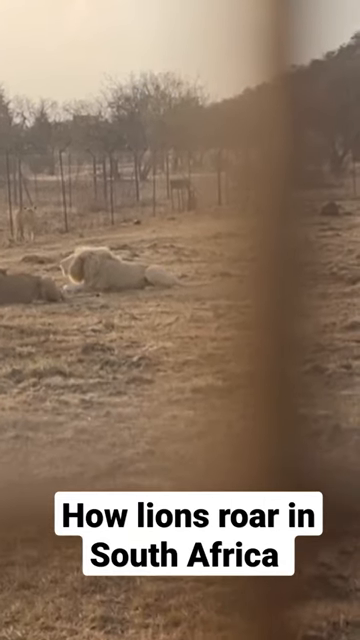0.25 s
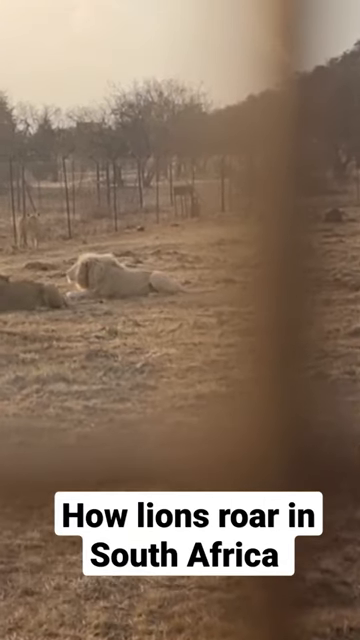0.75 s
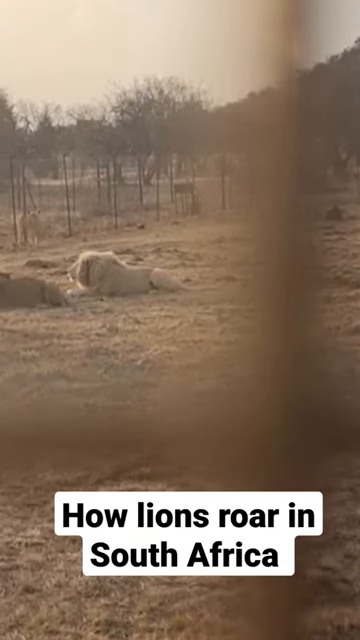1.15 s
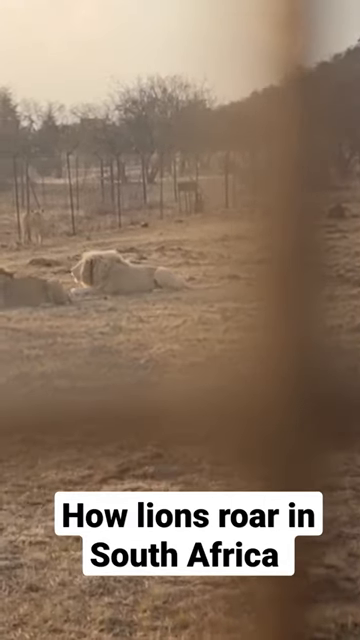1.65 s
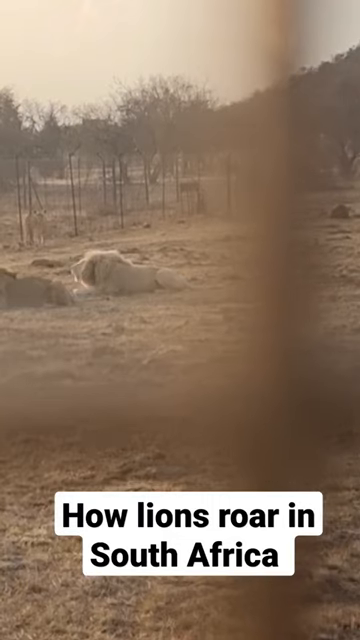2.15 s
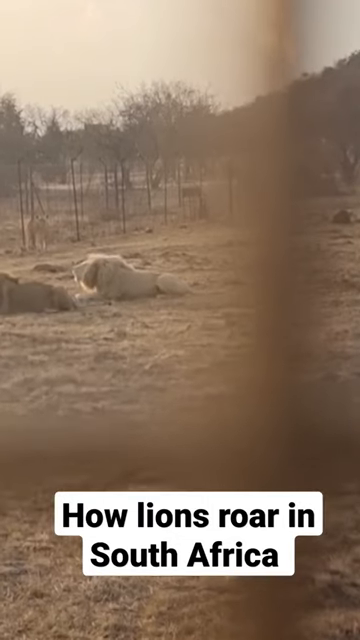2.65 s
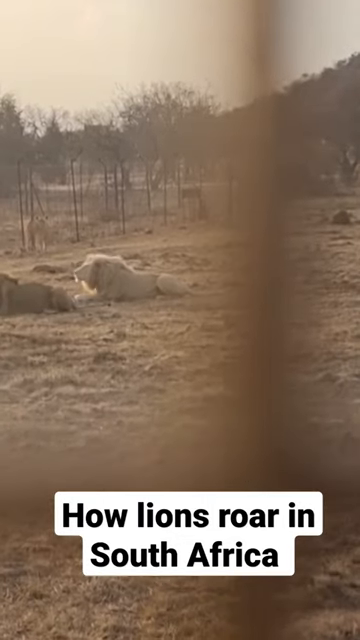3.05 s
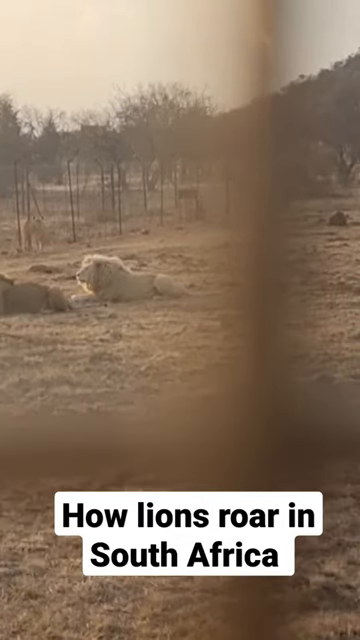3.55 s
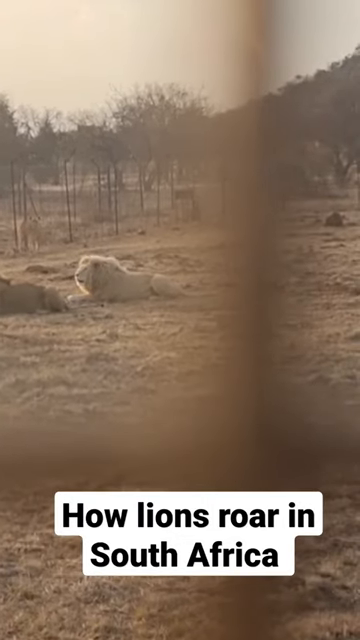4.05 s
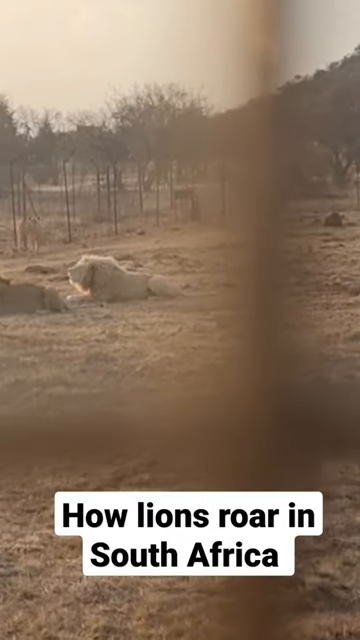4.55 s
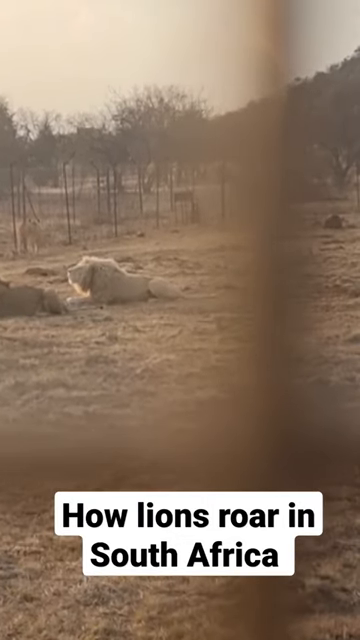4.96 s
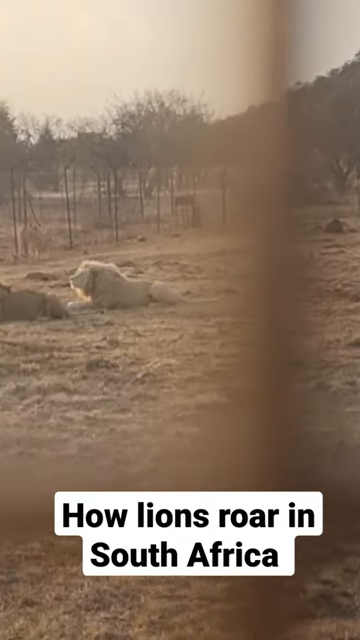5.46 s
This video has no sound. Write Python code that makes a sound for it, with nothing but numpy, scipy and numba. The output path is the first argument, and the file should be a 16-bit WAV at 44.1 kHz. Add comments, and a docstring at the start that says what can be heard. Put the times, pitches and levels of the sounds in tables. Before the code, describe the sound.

A lion gives three loud, deep roars outdoors, each breaking into a growl and followed by a short rough grunt, over quiet open air.

```python
"""A lion roars three times across an open enclosure, over quiet outdoor air: filtered noise.
The first roar opens in voice; the next two start as growls. Each is a falling tone that breaks up,
made by beating vocal folds that ring the throat and mouth, with a rumbling chest and hissing air.
Soft hums fill the pauses, a short rough grunt of slack folds follows each roar, and noise scuffs nearby.
A fence and a hill add short and long faint tails; the last grunt runs into the end."""
import sys
import numpy as np
from scipy import signal
from scipy.fft import rfft, irfft
from scipy.io import wavfile
from scipy.ndimage import uniform_filter1d
from numba import njit

SR = 44100
rng = np.random.default_rng(int(sys.argv[2]) if len(sys.argv) > 2 else 0)


def output_pcm(signal):
    """Save a mono or channel-first signal as 16-bit PCM at the path in sys.argv[1].

    Samples are clipped to [-1, 1] before scaling.
    """
    pcm = np.clip(np.atleast_2d(signal).T, -1, 1) * 32767
    wavfile.write(sys.argv[1], SR, np.round(pcm).astype(np.int16))


N = 252252
TIME = np.arange(N) / SR  # seconds


def undb(db):
    """Decibels to gain."""
    return 10 ** (np.asarray(db) / 20)


def unit(x):
    """Scale to an average level (rms) of 1."""
    return x / np.sqrt(np.mean(x ** 2))


def steady(x, seconds):
    """Even out swells slower than the given time, to a level near 1."""
    size = int(seconds * SR)
    power = uniform_filter1d(uniform_filter1d(x ** 2, size), size)
    return x / np.sqrt(power + 1e-9)


def swell(tables, axis):
    """Gain over time from one dB column of several calls; 15 ms fades lead to silence between them."""
    gain = 0
    for rows in map(np.array, tables):
        depth_inside = np.minimum(TIME - rows[0, 0], rows[-1, 0] - TIME)
        inside = np.clip(1 + depth_inside / .015, 0, 1)
        gain = gain + inside * undb(np.interp(TIME, rows[:, 0], rows[:, axis]))
    return gain


def glide(tables):
    """Second column of the tables, gliding over time from row to row."""
    rows = np.vstack(tables)
    return np.interp(TIME, rows[:, 0], rows[:, 1])


def walk(rate):
    """Smooth chance that heads for a new value `rate` times a second; rms 1."""
    size = int(SR / rate)
    steps = np.repeat(rng.standard_normal(N // size + 1), size)
    return unit(uniform_filter1d(steps, size)[:N])


def bursts(events):
    """Gain over time of quick swells that die away."""
    gain = 0
    for start, db, decay in events:
        age = np.maximum(TIME - start, 0)
        gain = gain + undb(db) * (1 - np.exp(-age / 0.0048)) * np.exp(-age / decay)
    return gain


def hold(start, length, attack, release):
    """Gain over time: rise to the start, hold for the length, die away."""
    before = np.maximum(start - TIME, 0)
    after = np.maximum(TIME - start - length, 0)
    return np.exp(-before / attack - after / release)


def level_off(gain, knee_db):
    """Grows in step with the gain, then flattens towards 1 above the knee."""
    return gain / (gain + undb(knee_db))


def colour(x, points, size=16384):
    """Filter through (Hz, dB) points, with no sound ahead of its cause (minimum phase)."""
    hz, db = np.transpose(points)
    bins = np.arange(size // 2 + 1) * SR / size
    cepstrum = irfft(np.log(undb(np.interp(np.log(bins + 1), np.log(hz), db))))
    # folding the second half onto the first makes the filter causal
    cepstrum[1:size // 2] *= 2
    cepstrum[size // 2 + 1:] = 0
    return signal.fftconvolve(x, irfft(np.exp(rfft(cepstrum))))[:N]


@njit
def band(x, g, k):
    """Band-pass with moving tuning g and relative width k, passed twice so that the valleys stay dark."""
    y, b, low = x.copy(), np.zeros(2), np.zeros(2)
    for i in range(len(x)):
        scale = 1 / (1 + g[i] * (g[i] + k))
        for j in range(2):
            v = (b[j] + g[i] * (y[i] - low[j])) * scale
            b[j], low[j], y[i] = 2 * v - b[j], low[j] + 2 * g[i] * v, k * v
    return y


def resonate(x, modes, stretch, jaw=1):
    """Parallel resonances: stretch shifts them all, the jaw mostly those near 1.2 kHz."""
    out = 0
    for hz, width, db in modes:
        reach = np.exp(-(np.log2(hz / 1200) / .6) ** 2)
        tuning = np.tan(np.pi * hz / SR) * stretch * (1 + reach * (jaw - 1))
        out = out + undb(db) * band(x, tuning * np.ones(N), width / hz)
    return out


def scatter(x, t60, tone):
    """Diffuse reflections that die away by 60 dB in t60 seconds."""
    age = TIME[:int(t60 * SR)]
    tail = rng.standard_normal(len(age)) * undb(-60 * age / t60) * (1 - np.exp(-age / 0.0011))
    tail = tail / np.sqrt(np.sum(tail ** 2))
    return colour(signal.fftconvolve(x, tail)[:N], tone)


def smear(x, t60, share):
    """Many close reflections blur each slap and comb the spectrum finely."""
    return np.sqrt(1 - share) * x + np.sqrt(share) * scatter(x, t60, [(100, 0), (1000, 0)])


def swing(hz, jitter):
    """Phase of the heavy folds, with a slightly unsteady pitch."""
    return 2 * np.pi * np.cumsum(hz * (1 + jitter * walk(60))) / SR


def hum(hz, jitter):
    """The nearly pure fundamental of heavy folds; rms 1."""
    return np.sqrt(2) * np.sin(swing(hz, jitter))


def folds(hz, jitter, scatter_db, open_share):
    """Vocal folds: one slap a cycle, uneven in time and size, and a puff of turbulence after each."""
    turns = np.cumsum(hz * np.exp(jitter * walk(150))) / SR
    cycle = turns.astype(int)
    chance = np.clip(rng.standard_normal(N // 50), -1.5, 1.5)
    size = undb(scatter_db * chance)[cycle]
    slaps = np.diff(cycle, prepend=0) * size
    # each puff fades over the open share of a cycle
    puffs = size * np.exp(-(turns % 1) / open_share) * rng.standard_normal(N)
    return unit(slaps), unit(puffs)


# The quiet outdoor air's tone. Each row: pitch in Hz, level in dB.
AIR_TONE = [(22, -26.5), (43, -8.5), (65, 2.5), (100, -14.5), (150, -0.5), (240, -25), (400, -23.5),
            (600, -25.5), (1100, -30), (1700, -38), (3000, -41), (5000, -48.5), (9000, -49.5), (15000, -57)]


def field():
    """Quiet outdoor air: a shared low rumble and a faint hiss that differs at each ear."""
    mid = unit(colour(rng.standard_normal(N), AIR_TONE))
    side = unit(colour(rng.standard_normal(N), AIR_TONE))
    side = colour(side, [(100, -20.5), (500, -8), (3000, 1.5)])
    breeze = undb(1.3 * walk(6))
    return undb(-50.5) * breeze * (mid + side * np.array([[1], [-1]]))


# Side branches of the tract swallow narrow bands. Each row: pitch in Hz, level in dB.
VALLEYS = [(440, 3), (520, -7), (590, 3), (1850, 1), (2010, -3), (2150, 1), (2440, -2.5), (2530, -18.5),
           (2630, -0.5)]
# The open mouth favours the upper middle. Each row: pitch in Hz, level in dB.
LIPS = [(650, 0), (810, -3), (1050, 0.5), (1350, -0.5), (1600, 2), (1950, 0), (3500, 1.5)]


def tract(throat_gain, mouth_gain, drive, throat, mouth, stretch, jaw=1):
    """The folds ring the resonances of the throat and the mouth, each with its own level."""
    drive = colour(drive, VALLEYS)
    blurred = smear(colour(drive, LIPS, size=2048), t60=.11, share=.38)
    throat_ring = steady(resonate(drive, throat, stretch), 0.048)
    mouth_ring = steady(resonate(blurred, mouth, stretch, jaw), 0.078)
    return throat_gain * throat_ring + mouth_gain * mouth_ring


# Rough, wavering second and third partials.
# Each entry: level in dB relative to the throat, before wavering.
OVERTONES = [2, -10]


def partials(phase):
    """The lowest overtones of the folds, each wavering quickly in level and phase."""
    return sum(undb(db) * undb(3 * walk(45)) * np.sin(k * phase + .6 * walk(70))
               for k, db in enumerate(OVERTONES, 2))


# Throat and mouth resonances in the full roar. Each row: pitch in Hz, width in Hz, relative level in dB.
ROAR_THROAT = [(361, 61, -1), (413, 92, 4.5)]
ROAR_MOUTH = [(660, 80, -0.5), (709.2, 32, -2), (974, 74, 2), (1145, 53, 1.5), (1334, 57, 3.5),
              (1398, 22, 7), (1622, 61, -11), (1780, 85, -5.5), (2208, 86, -7.5), (2399, 110, -6.5),
              (2716, 110, -22), (3370, 74, -18.5), (3870, 180, -21)]


def full_roar(throat, mouth, voiced, locked):
    """Evenly beating folds ring the wide-open tract, which nearly holds its shape."""
    held = 1 + .008 * walk(14)
    return np.sqrt(locked) * tract(throat * undb(-1), mouth, voiced, ROAR_THROAT, ROAR_MOUTH, held)


# How the air passing the teeth sounds. Each row: pitch in Hz, level in dB.
HISS_TONE = [(1700, -52), (2400, -9.5), (2750, 5.5), (3050, -1.5), (3400, -0.5), (4100, -7), (5000, -14.5),
             (7000, -21), (10500, -26), (11500, -31), (15000, -37.5)]


def teeth_hiss(puffs, gusts, effort, locked):
    """Air hisses past the teeth; it grows with effort, levels off, and is softer when the folds lock."""
    full_db, knee_db, locked_db = -40, -32.5, -8.5
    air = smear(puffs + .6 * gusts, t60=.08, share=.75)
    level = level_off(effort, knee_db) * undb(full_db + locked_db * locked)
    return level * steady(colour(air, HISS_TONE), 0.043)


def treble_spray(effort):
    """A fine spray of treble noise rises and falls with the effort."""
    noise = colour(rng.standard_normal(N), [(2000, -15.5), (6500, 9.0), (15000, -7.0)])
    return undb(-33) * effort * unit(noise)


# The shaken chest's tone. Each row: pitch in Hz, level in dB.
CHEST_TONE = [(22, -41.5), (45, -16.5), (70, -4.5), (95, 3.5), (120, 9), (150, 1), (210, 2.5), (260, -5.5),
              (400, -69), (1500, -110)]
# Spells of low chest rumble within the roars; the first is brief and faint, right at the start. Each row: start
# in seconds, length in seconds, chest level in dB before the roar's overall mix.
RUMBLES = [(0, 0.088, -37.5), (0.562, 0.12, -22.5), (2.358, 0.21, -24), (3.066, 0.25, -31.5),
           (4.618, 0.28, -35), (4.777, 0.21, -23.5), (5.496, 0.047, -28)]


def chest_rumble(slack, gusts, effort):
    """The slow flapping shakes the chest, in spells of rumble and, more softly, under the whole effort."""
    attack_s, release_s, undertone_db = 0.047, 0.043, -7.5
    rumble = colour(slack, CHEST_TONE) + resonate(gusts, [(127.8, 32, 4.1)], stretch=0.88)
    shake = sum(undb(db) * hold(start, length, attack_s, release_s) for start, length, db in RUMBLES)
    return np.hypot(shake, effort * undb(undertone_db)) * steady(rumble, .016)


# Throat and mouth resonances in a growl. Each row: pitch in Hz, width in Hz, relative level in dB.
GROWL_THROAT = [(344.4, 76.7, 0.5), (405, 31, -10)]
GROWL_MOUTH = [(585, 180, -10), (756, 76, -1.5), (1060.5, 80, 6.5), (1164, 79, 2), (1345, 95, 2),
               (1734, 110, -6.5), (1868, 46, -14), (2262, 150, -9), (2650, 300, -13)]
# The jaws open and close in growls and grunts. Each row: time in seconds,
# tuning factor for mouth resonances near 1.2 kHz (a weaker shift further away).
JAW = [(.4, 1.17), (.5, 1.14), (.62, 1.03), (1.42, 0.96), (1.49, 0.87), (1.56, 1.27), (1.62, 0.97),
       (2.28, 1), (2.38, 1.14), (2.83, 1.08), (2.92, 1.07), (3.1, 0.89), (3.25, 1.056), (4, 1.015),
       (4.65, 1), (4.72, 1.113), (5.21, 1.146), (5.32, 1.004), (5.5, 0.98)]


def slack_growl(throat, mouth, slack, locked, loose):
    """Slack, flapping folds ring a loose tract that shifts about as the jaws move."""
    growl = tract(throat * undb(-0.5), mouth, slack, GROWL_THROAT, GROWL_MOUTH, loose, glide([JAW]))
    return np.sqrt(1 - locked) * growl


# The throat catches and the rasp flares.
# Each row: start in seconds, level in dB before the swell and decay, decay in seconds.
CATCHES = [(.46, -44.5, 0.04), (2.81, -31.5, 0.032), (2.912, -29.5, .02), (4.589, -42, 0.012),
           (4.657, -24.5, 0.02), (5.183, -29, 0.041), (5.31, -29, 0.041)]


def throat_catches(slack, loose):
    """Brief flares of blurred slack folds, ringing the mouth."""
    blurred = smear(slack, t60=.1, share=.5)
    rasp = resonate(blurred, GROWL_MOUTH, loose, glide([JAW]))
    return bursts(CATCHES) * steady(rasp, 0.053)


# The voice of each roar, one list a roar.
# Each row: time in seconds, pitch in Hz, level of the fundamental in dB before shudder and mix.
VOICE = [
    [(0, 211.1, -7), (.13, 206.4, -11), (.21, 196.4, -8.5), (.25, 238.9, -28.5), (.34, 235.2, -27.5),
     (.36, 161.4, -23), (.4, 156.3, -7), (.5, 145.4, -11), (.62, 138.2, -9.5), (.7, 104.7, -22),
     (.77, 110, -26), (.81, 111, -46)],
    [(2.25, 145, -28), (2.32, 159.3, -18), (2.41, 116.9, -13.5), (2.44, 124.9, -14), (2.46, 207.2, -8.5),
     (2.58, 205.6, -9.5), (2.75, 188.7, -20.5), (2.81, 156.1, -22.5), (3, 141.2, -14.5), (3.15, 116, -30.5),
     (3.23, 125.8, -20), (3.36, 92, -30.5)],
    [(4.57, 150.7, -35.5), (4.65, 147, -14), (4.71, 165.3, -29), (4.77, 201.5, -14), (4.9, 205.3, -9.5),
     (5.04, 192.2, -11.5), (5.08, 183.2, -18.5), (5.115, 159, -14.5), (5.24, 152.2, -7.5),
     (5.45, 133.2, -10.5), (5.54, 114.9, -21.5), (5.58, 93.7, -27)],
]
# How evenly the folds swing in the roars. Each row: time in seconds, locked share from 0 to 1.
LOCK = [(0, .72), (.3, .82), (.36, .5), (.53, .3), (.62, .05), (2.38, .08), (2.5, .85), (2.7, .72), (3, .3),
        (3.1, .05), (4.7, .04), (4.82, .65), (5.02, .75), (5.2, .68), (5.35, .25), (5.5, .05)]
# Effort in each roar, one list a roar. Each row: time in seconds, effort in dB (it drives the rasp).
EFFORT = [
    [(0.0, -22.5), (0.03, -36.5), (0.342, -27), (0.452, -35.5), (0.482, -31), (0.524, -37), (0.664, -34.5),
     (0.84, -67)],
    [(2.22, -66), (2.276, -44.5), (2.372, -33), (2.838, -31), (3.052, -40.5), (3.078, -35.5), (3.316, -50),
     (3.42, -65.5)],
    [(4.54, -75), (4.602, -33), (4.826, -24), (5.17, -29.5), (5.188, -26), (5.454, -38), (5.492, -32.5),
     (5.61, -65.5)],
]
# The folds close cleanly only in the upper register.
# Each row: pitch in Hz, clean share of the drive from 0 to 1.
REGISTER = [(170, .15), (204, .72)]


def roars():
    """Heavy folds swing evenly when locked and flap slowly, irregularly when slack; effort drives the rasp."""
    hz, locked, effort = glide(VOICE), glide([LOCK]), swell(EFFORT, axis=1)
    slackness = (1 - locked) ** 4

    # the fundamental shudders more as the folds go slack
    shudder = undb(np.interp(slackness, [0, 1], [1.4, 3.2]) * walk(65))
    phase = swing(hz, jitter=.011 + .035 * slackness)
    tone = swell(VOICE, axis=2) * shudder * np.sqrt(2) * np.sin(phase)

    slaps, puffs = folds(hz, jitter=.016 * (1.3 - locked) / .6, scatter_db=3, open_share=.45)
    flaps, gusts = folds(np.full(N, 70.), jitter=.22, scatter_db=3.5, open_share=.33)
    clean = np.interp(hz, *np.transpose(REGISTER))
    voiced = np.sqrt(clean) * slaps + np.sqrt(1 - clean) * puffs
    slack = flaps + .6 * gusts

    # the throat grows with effort up to a knee, then levels off
    throat_db, throat_knee_db, rasp_db = -23.5, -32.5, -1
    # above this pitch the overtone leaves the throat resonance
    throat_top_hz, loss_db_per_hz = 223.4, .5
    loss_db = loss_db_per_hz * np.maximum(hz - throat_top_hz, 0)
    throat = level_off(effort, throat_knee_db) * undb(throat_db - loss_db)
    mouth = effort * undb(rasp_db)
    loose = 1 + .02 * walk(22)

    voice = undb(0.5) * tone + locked * clean * throat * partials(phase)
    voice = voice + undb(1.4) * full_roar(throat, mouth, voiced, locked)
    voice = voice + undb(-1.7) * slack_growl(throat, mouth, slack, locked, loose)
    voice = voice + throat_catches(slack, loose) + undb(5.5) * chest_rumble(slack, gusts, effort)
    return voice + teeth_hiss(puffs, gusts, effort, locked) + treble_spray(effort)


def fence(direct):
    """The fence scatters mostly treble sideways: a very short tail, opposite in the two ears."""
    tone = [(150, -23.0), (350, -16.0), (700, -8.5), (1400, -11.5), (2200, -5.5), (5000, -6.5)]
    return scatter(direct, t60=0.062, tone=tone) * np.array([[1], [-1]])


def hill(direct):
    """Trees and hill send back a faint, longer tail, separate at each ear."""
    tone = [(150, -46.5), (400, -37), (1100, -36.5), (4000, -48)]
    return np.array([scatter(direct, t60=0.63, tone=tone) for _ in range(2)])


# Short surges of throat, rasp and hiss in grunts and roars;
# at 2.646 and 4.885 s the throat rings as the second harmonic crosses its resonance.
# Each row: start in seconds, length in seconds, throat level in dB, rasp level in dB, hiss level in dB.
SURGES = [(.56, 0.031, -31, -43, -44), (0.644, 0.053, -23, -39, -44.5), (0.749, .015, -39, -68, -59.5),
          (1.343, 0.01, -32.5, -68, -56.5), (1.4, 0.037, -30.5, -39.5, -46),
          (1.487, 0.044, -23, -45.5, -47), (1.545, 0.055, -44, -54, -55), (2.288, 0.03, -27.5, -45, -67),
          (2.352, 0.037, -23, -36, -48.5), (2.435, .04, -19, -41, -46), (2.646, 0.036, -29.5, -45, -72.5),
          (3.072, 0.017, -31, -33.5, -46.5), (3.21, 0.04, -32, -42.5, -46),
          (3.298, 0.032, -33.5, -57, -49.5), (3.893, 0.018, -41, -67, -68),
          (3.959, 0.059, -31, -44.5, -45.5), (4.042, 0.046, -37, -59, -51), (4.885, 0.022, -20.5, -32, -44),
          (5.476, 0.021, -26, -36.5, -48.5), (5.703, 0.028, -30.5, -48, -51.5)]


def surges():
    """In grunts and short surges, slack folds ring a loose, shifting tract as air rushes past the teeth."""
    attack_s, release_s = 0.0051, 0.013
    levels = sum(undb(levels_db)[:, None] * hold(start, length, attack_s, release_s)
                 for start, length, *levels_db in SURGES)
    # throat, rasp and hiss of a grunt, relative to its effort in dB
    throat, mouth, hiss = levels + undb([-21.5, -36.5, -36.5])[:, None] * grunt_effort()
    flaps, gusts = folds(np.full(N, 64.), jitter=.22, scatter_db=4, open_share=.3)
    drive = flaps + .45 * gusts
    loose = 1 + .045 * walk(25)
    growl = tract(throat, mouth, drive, GROWL_THROAT, GROWL_MOUTH, 0.99 * loose, glide([JAW]))
    air = smear(gusts + .6 * rng.standard_normal(N), t60=.08, share=.6)
    rush = colour(colour(air, HISS_TONE), [(1900, 7.5), (2800, 0), (5200, 3.5), (9000, -2), (15000, 5)])
    return growl + hiss * steady(rush, 0.11)


# Soft moans slide up onto their note.
# Each row: start in seconds, length in seconds, pitch in Hz, level in dB before the hum's own mix.
MOANS = [(0.973, .33, 146, -59.5), (1.833, 0.38, 138.4, -38.5), (4.19, 0.12, 169.2, -50.5),
         (4.445, 0.12, 124, -39)]


def moans():
    """A closed-mouth hum, nearly a pure tone, with a trace of mouth resonance."""
    attack_s, release_s, slide_hz_per_s = .035, .025, 200
    rasp = unit(resonate(rng.standard_normal(N), GROWL_MOUTH, stretch=0.93))
    waver = undb(4.2 * walk(24.86))
    out = 0
    for start, length, hz, db in MOANS:
        pitch = np.maximum(hz - slide_hz_per_s * np.maximum(start - TIME, 0), hz / 2)
        voice = undb(1.5) * waver * hum(pitch, jitter=0.023) + undb(-30) * rasp
        out = out + undb(db) * hold(start, length, attack_s, release_s) * voice
    return out


# Grunts swell and fade in an arch while the pitch sags.
# Each row: start in seconds, length in seconds, effort in dB, first pitch in Hz, last pitch in Hz.
GRUNTS = [(1.338, 0.3, -19, 142, 96), (3.897, 0.25, -22.5, 155, 88.16), (5.643, .25, -17, 150, 104)]


def grunt_effort():
    """Each grunt starts quickly, swells in an arch and dies away."""
    attack_s, release_s, arch_db = 0.013, 0.038, -15.5
    effort = 0
    for start, length, db, _, _ in GRUNTS:
        off_centre = np.clip(2 * (TIME - start) / length - 1, -1, 1)
        arch = undb(db + arch_db * off_centre ** 2)
        effort = effort + arch * hold(start, length, attack_s, release_s)
    return effort


# The grunting chest's tone. Each row: pitch in Hz, level in dB.
GRUNT_CHEST = [(22, -31), (45, -10), (70, -7.5), (110, 5), (150, -2.5), (210, 2), (260, -14), (400, -50.5),
               (1500, -110)]


def grunts():
    """The chest of each grunt: slack folds sag in pitch and slap only on about every other swing."""
    hz = glide([[(start, first), (start + length, last)] for start, length, _, first, last in GRUNTS])
    flaps, gusts = folds(hz / 2, jitter=.2, scatter_db=3.5, open_share=.35)
    chest = unit(colour(flaps + .6 * gusts, GRUNT_CHEST))
    chest_and_hum = chest + undb(-0.5) * hum(hz, jitter=0.0759)
    return undb(2.5) * grunt_effort() * steady(chest_and_hum, 0.024)


# Short scuffs close by.
# Each row: start in seconds, level in dB before the swell and decay, decay in seconds.
SCUFFS = [(1.995, -53.5, 0.031), (2.072, -52, 0.1), (2.742, -27, 0.04)]
# The scuffs' tone. Each row: pitch in Hz, level in dB.
SCUFF_TONE = [(400, -15), (1150, 2), (2200, -1), (3200, -9), (5000, -16.5), (8000, -21.5), (10000, -32),
              (15000, -35.5)]


def scuffs():
    """Short, grainy rubs near the microphone: noise with a fast, uneven level."""
    rub = colour(rng.standard_normal(N) * undb(1.5 * walk(500)), SCUFF_TONE)
    return bursts(SCUFFS) * unit(smear(rub, t60=.1, share=.6))


# Left minus right at the microphone. Each row: pitch in Hz, difference in dB.
EAR_DIFFERENCE = [(100, -0.5), (200, -3), (390, 0.2), (620, -5), (1000, 0), (1500, -5), (2250, 7),
                  (3000, 3), (4500, 1), (8000, 3.5)]


def ears(direct):
    """Each ear takes half the level difference, with opposite signs."""
    return np.array([colour(direct, [(hz, side * db / 2) for hz, db in EAR_DIFFERENCE])
                     for side in (1, -1)])


def scene():
    """The lion and the scuffs, their reflections from fence and hill, and the air of the field."""
    direct = roars() + surges() + moans() + grunts() + scuffs()
    return ears(direct) + fence(direct) + hill(direct) + field()


def record(dry):
    """The recorder holds the peaks at full scale and cuts the top above 15.5 kHz."""
    held = dry / (1 + dry ** 8) ** (1 / 8)
    top_cut = signal.ellip(8, .2, 70, 15500, fs=SR, output="sos")
    return signal.sosfilt(top_cut, held)


dry = scene()
out = record(dry)
output_pcm(out)
```